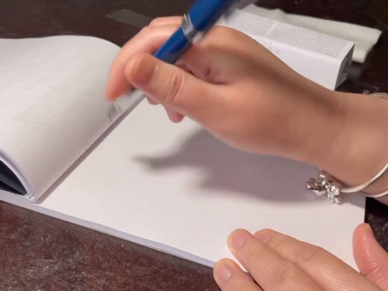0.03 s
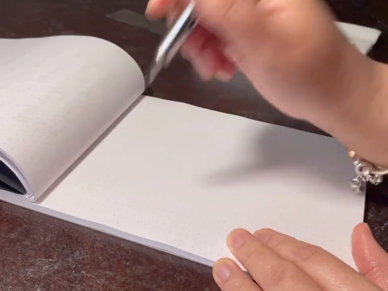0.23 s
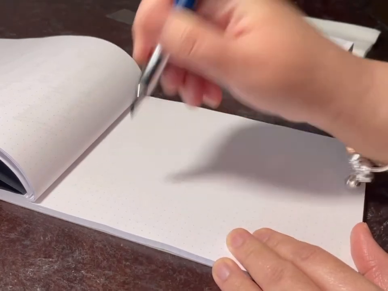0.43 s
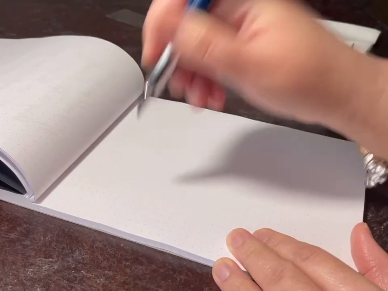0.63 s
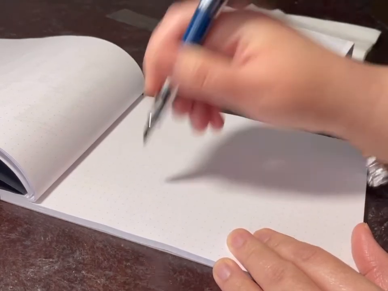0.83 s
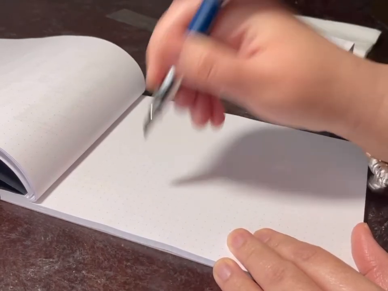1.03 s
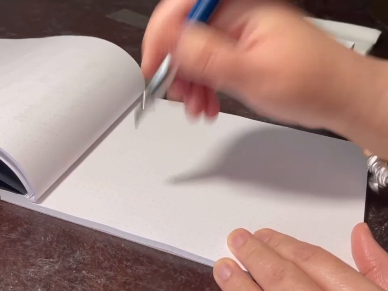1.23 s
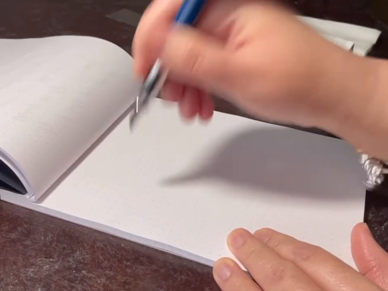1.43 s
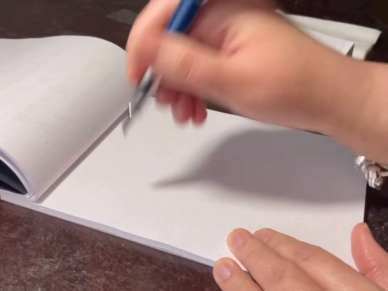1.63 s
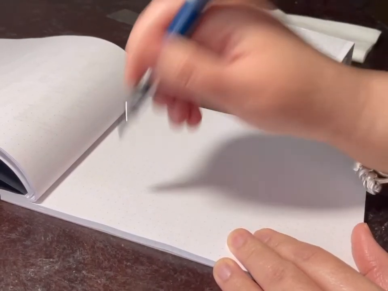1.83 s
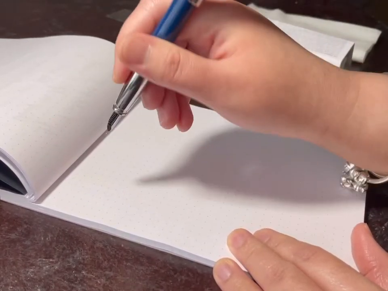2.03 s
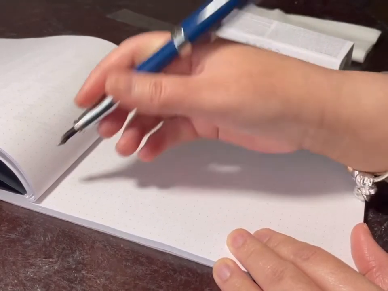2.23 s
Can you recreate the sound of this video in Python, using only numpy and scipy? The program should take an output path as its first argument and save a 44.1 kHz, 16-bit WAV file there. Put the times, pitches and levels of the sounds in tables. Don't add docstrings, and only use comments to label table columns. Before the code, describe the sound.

A beaded metal bracelet jingles drily on a shaking wrist, with one knock on the desk

```python
import sys
import numpy as np
from scipy import signal
from scipy.fft import rfft, irfft, next_fast_len
from scipy.io import wavfile
from scipy.ndimage import uniform_filter1d

SR = 44100
rng = np.random.default_rng(int(sys.argv[2]) if len(sys.argv) > 2 else 0)


def ratio_of_db(decibels):
    return 10 ** (np.asarray(decibels, float) / 20)


def unload_audio(sound):
    columns = np.transpose(np.atleast_2d(sound))
    steps = np.round(np.clip(columns, -1, 1) * 32767)
    wavfile.write(sys.argv[1], SR, steps.astype(np.int16))


N = 101429

# time in seconds, peak in dB.
BEAD_CLASHES = [(0.0683, -41), (0.209, -40.5), (0.2764, -25.5), (0.3006, -23.5), (0.3272, -30.5),
                (0.368, -28), (0.4626, -30.5), (0.4695, -24.5), (0.49, -29), (0.503, -22), (0.5129, -18.5),
                (0.5296, -47), (0.5821, -34), (0.623, -39), (0.634, -57), (0.6765, -45), (0.6795, -28),
                (0.6895, -28), (0.7131, -26), (0.725, -6.5), (0.7962, -30), (0.8646, -32), (0.9001, -34),
                (0.9401, -28.5), (0.9523, -34), (0.9585, -14), (1.0301, -45), (1.074, -33.5),
                (1.0868, -27.5), (1.1303, -41), (1.1396, -25.5),
                (1.1584, -19.5), (1.1745, -16), (1.187, -34), (1.2218, -25), (1.27, -32), (1.28, -29.5),
                  (1.288, -18), (1.3022, -42), (1.317, -40), (1.3378, -26), (1.3441, -21), (1.3666, -22.5),
                  (1.382, -23), (1.3864, -32), (1.414, -31.5), (1.43, -28.5), (1.4375, -24.5),
                  (1.4916, -25), (1.4978, -26), (1.504, -22), (1.5114, -23), (1.524, -25), (1.5397, -19.5),
                  (1.544, -20.5), (1.57, -27.5), (1.5848, -20), (1.5912, -34), (1.6093, -22.5),
                  (1.666, -35), (1.675, -36),
                (1.69, -23), (1.696, -28), (1.7003, -25.5), (1.728, -26), (1.7484, -17.5), (1.758, -27),
                (1.773, -22), (1.8004, -20.5), (1.8662, -33.5), (1.8847, -24), (1.8909, -22.5),
                (1.9126, -20), (1.9712, -35), (1.9826, -32), (2.0188, -49), (2.052, -31), (2.0763, -45),
                (2.095, -26.5), (2.1216, -19.5), (2.1352, -22), (2.196, -44), (2.2286, -25),
                (2.2381, -24.5), (2.2665, -25.5), (2.2775, -32.5), (2.2908, -25)]
# start in seconds, length in seconds, level in dB.
RATTLE_RUNS = [(0, 0.0073, -47.5), (0.1, 0.034, -45), (.272, 0.019, -37.5), (0.493, 0.017, -38),
               (0.712, 0.049, -36.5), (0.953, 0.04, -42), (1.128, 0.048, -38.5), (1.297, 0.057, -42),
               (1.364, 0.018, -37), (1.486, 0.083, -44.5), (1.577, 0.022, -38), (1.677, 0.071, -51.5),
               (1.765, 0.025, -37.5), (1.874, 0.04, -42.5), (1.976, 0.015, -45), (2.099, 0.08, -60.5),
               (2.235, 0.094, -62)]
# start in seconds, length in seconds, level in dB.
BEAD_HEAPS = [(.2995, 0.0052, -36.5), (.3275, 0.0043, -38.5), (.1005, 0.0021, -28), (.3748, 0.0022, -38),
              (.7265, 0.0046, -38), (.8152, 0.0022, -26.5), (1.369, 0.011, -43), (1.539, 0.0044, -42),
              (1.582, 0.0057, -45.5), (1.798, 0.0065, -39.5), (1.908, 0.0096, -40.5), (1.98, 0.008, -35),
              (1.992, 0.007, -44)]
# frequency in Hz, gain in dB.
BEAD_COLOUR = [(900, -37), (2200, -15), (4000, -9.5), (6500, -6.5), (8200, -0.5), (10800, -1.5),
               (13200, -4.5), (15000, 2.5), (17000, -45)]
# time in seconds, peak in dB, share of the full ring length from 0 to 1.
CHARM_STRIKES = [
    (.1005, -11.5, .9),
    (.3748, -13, .9),
    (.7696, -19.5, .6),
    (.8152, -22, .65),
    (.9762, -25, .8),
]
# frequency in Hz, level in dB, T60 in seconds.
CHARM_MODES = [(4400, -20, .008), (4900, -20, .008), (7127, -13, .016), (8829, -13, .012), (10700, 0, .012),
               (10880, -13, .03), (12940, -5, .02), (15280, -12, .012)]
# time in seconds, peak in dB, share of the full ring length from 0 to 1.
DESK_KNOCKS = [
    (.7262, -13, 1),
]
# frequency in Hz, level in dB, T60 in seconds.
DESK_MODES = [(295, -15.5, 0.061), (452, -16, 0.2), (1003, -6.5, 0.036), (1077, -13.5, 0.14),
              (1546, -21, 0.061), (1960, -17, 0.19), (2062, -5.5, 0.12), (2270, 1, 0.044),
              (3223, -7, 0.098), (3374, 1.5, 0.028), (3666, -2.5, 0.031), (4710, -3, 0.02)]
# frequency in Hz, gain in dB.
CRACK_COLOUR = [(300, -15), (1000, -3.5), (2600, -1), (4800, -3.5), (7000, -4), (12000, -17)]
# start in seconds, length in seconds, level in dB.
PAPER_RUBS = [(0, 0.054, -51.5), (.075, 0.066, -45), (.278, 0.015, -39.5), (.288, 0.015, -46.5),
              (.33, 0.0097, -52), (.505, 0.023, -59), (.725, 0.023, -31.5), (.76, 0.082, -48.5),
              (.965, 0.0072, -47.5), (1.845, 0.055, -52), (1.878, 0.034, -39), (1.93, 0.06, -63),
              (1.98, 0.023, -45), (2.01, 0.06, -50), (2.1, 0.093, -54.5), (2.21, 0.12, -44)]
# time in seconds, peak in dB.
PAD_TAPS = [
    (.2845, -21),
    (.2895, -28),
    (.304, -29),
    (0.3064, -29),
    (.971, -33.5),
    (1.681, -48),
    (1.769, -37),
]
# centre in Hz, width in Hz, gain in dB.
PAPER_RESONANCES = [(857, 273, -0.5), (1366, 404, 3), (1797, 735, -0.5), (3760, 3000, -9)]
# start in seconds, length in seconds, level in dB.
HAND_BUMPS = [
    (.05, 0.029, -63.5),
    (.278, 0.027, -52),
    (.505, 0.029, -58),
    (.716, 0.044, -46),
    (.965, 0.012, -54),
    (2.26, 0.031, -61),
]
# frequency in Hz, T60 in seconds.
ROOM_DECAY = [(200, 0.11), (1000, 0.2), (4000, 0.2), (12000, 0.057)]
# frequency in Hz, gain in dB.
WIDE_ECHO = [(300, -11), (1200, -5.5), (2500, -12), (9000, -13.5)]
# frequency in Hz, density in dB per Hz.
AIR_COLOUR = [(20, -20), (32, -13.5), (60, -1), (130, -10.5), (300, -20), (800, -32.5), (6000, -45.5),
              (16000, -40)]
# frequency in Hz, likeness from 0 to 1.
AIR_LIKENESS = [(60, 0.97), (400, 0.37), (1500, 0.1), (3000, 0.66), (8000, 0)]
# frequency in Hz, phase in radians.
PORT_PHASE = [(5700, 0), (6350, -.6), (7700, -2.5), (8800, -3.7), (10400, -5.4), (13000, -7.3), (14200, -9),
              (16400, -10.6)]
# frequency in Hz, left minus right in dB.
PORT_TILT = [(270, -0.5), (1000, 1.5), (5500, 3.5), (8000, 0.2)]

BEAD_SCATTER_DB, CLASH_T60_S, SNAP_DB, LOUDEST_CLASH_DB = 2.6, 0.015, 4, -18
CONTACTS_PER_S, CONTACT_SPREAD_DB, STIR_DB = 2000, 2.2, -60
RUN_RISE_S, RUN_T60_S, HEAP_RISE_S, HEAP_T60_S = 0.0021, 0.12, 0.0016, 0.016
CRACK_DB, CRACK_T60_S = -25, 0.045
THUD_S, THUD_HZ, THUD_DB, THUD_T60_S = 0.735, 132.6, -34.5, 0.38
RUB_SLIPS_PER_S, RUB_GRAIN_DB, RUB_RISE_S, RUB_T60_S = 6000, 3, 0.0028, 0.061
BUMP_HZ, BUMP_WIDTH_HZ, BUMP_T60_S = 370, 550, 0.16
ROOM_DB, BEAD_SPREAD = -10, 0.23
AIR_DB, SWELL_DB = -52, 2.5
DROP_DB, EDGE_HZ, JUMP_DB, JUMP_EDGE_HZ = 6.5, 16100, 7, 16850


def clashes():
    out = np.zeros(N)
    rows = BEAD_CLASHES
    t = np.arange(2048) / SR
    envelope = np.minimum(t / 0.00048, 1) * ratio_of_db(-60 * t / CLASH_T60_S)
    snap = ratio_of_db(SNAP_DB) * (np.arange(2048) == 12)
    lump_hz = np.linspace(0, 17000, num=16)
    for s, db in rows:
        lumps = BEAD_SCATTER_DB * rng.standard_normal(16)
        puff = rng.standard_normal(2048) * envelope + snap
        puff = tint(puff, lambda hz: ratio_of_db(read(BEAD_COLOUR, hz) + np.interp(hz, lump_hz, lumps)))
        add(out, s, ratio_of_db(min(db, LOUDEST_CLASH_DB)) * puff / abs(puff).max())
    return out


def rattle():
    contacts = slips(CONTACTS_PER_S, CONTACT_SPREAD_DB) ** 2
    decay = ratio_of_db(-120 * np.arange(300) / SR / 0.0042)
    flutter = np.sqrt(abs(signal.oaconvolve(contacts, decay)[:N]))
    noise = tint(flutter * rng.standard_normal(N), lambda hz: ratio_of_db(read(BEAD_COLOUR, hz)))
    runs = strokes(RATTLE_RUNS, RUN_RISE_S, RUN_T60_S)
    heaps = strokes(BEAD_HEAPS, HEAP_RISE_S, HEAP_T60_S)
    return (ratio_of_db(STIR_DB) + runs + heaps) * evened(noise)


def charm():
    return strikes(CHARM_STRIKES, CHARM_MODES, spread_db=-6)


def knock():
    return strikes(DESK_KNOCKS, DESK_MODES, spread_db=-1.0)


def crack():
    burst = evened(tint(rng.standard_normal(N), lambda hz: ratio_of_db(read(CRACK_COLOUR, hz))))
    return strokes([(DESK_KNOCKS[0][0], 0.003, CRACK_DB)], 0.00038, CRACK_T60_S) * burst


def thud():
    after = np.maximum(np.arange(N) / SR - THUD_S, 0)
    envelope = ratio_of_db(THUD_DB - 60 * after / THUD_T60_S) * np.minimum(after / 0.0053, 1)
    return envelope * np.sin(2 * np.pi * THUD_HZ * after)


def rub():
    drive = strokes(PAPER_RUBS, RUB_RISE_S, RUB_T60_S) * slips(RUB_SLIPS_PER_S, RUB_GRAIN_DB)
    for s, db in PAD_TAPS:
        add(drive, s, ratio_of_db(db) * np.hanning(14))

    def pad(hz):
        return np.sqrt(sum(ratio_of_db(2 * db) * bell(hz, centre, width) for centre, width, db in PAPER_RESONANCES))
    return tint(drive, pad) * ratio_of_db(7)


def bumps():
    dull = tint(rng.standard_normal(N), lambda hz: bell(hz, BUMP_HZ, BUMP_WIDTH_HZ))
    return strokes(HAND_BUMPS, 0.0022, BUMP_T60_S) * evened(dull)


def room(x):
    size = SR // 2
    signs = rng.choice([-1., 1.], (2, size))
    taps = signs * (rng.random((2, size)) < 0.06) * (np.arange(size) > 90)
    hz, t, z = signal.stft(taps, SR, nperseg=256)
    decay = ratio_of_db(-60 * t / read(ROOM_DECAY, hz)[:, None])
    tail = signal.istft(z * decay, SR, nperseg=256)[1]
    return signal.fftconvolve(x[None], tail / np.linalg.norm(tail[0]), axes=1)[:, :N]


def air():
    left, other, waver = rng.standard_normal((3, N))

    def same(hz):
        return np.clip(read(AIR_LIKENESS, hz), 0, 1)
    right = tint(left, same) + tint(other, lambda hz: np.sqrt(1 - same(hz) ** 2))
    swell = ratio_of_db(SWELL_DB * evened(slow(waver, 8)))
    return ratio_of_db(AIR_DB) * evened(swell * tint(np.array([left, right]), lambda hz: ratio_of_db(read(AIR_COLOUR, hz))))


def strikes(rows, modes, spread_db):
    out = np.zeros(N)
    for s, db, free in rows:
        add(out, s, ratio_of_db(db) * ring(modes, rng.standard_normal(14), spread_db, free))
    return out


def ring(modes, shake, spread_db, free):
    t = np.arange(int(SR / 4)) / SR
    x = np.zeros(len(t))
    for (hz, db, t60), nudge in zip(modes, shake):
        decay = ratio_of_db(db + spread_db * nudge - 60 * t / t60 / free)
        x += decay * np.sin(2 * np.pi * hz * t + 2 * nudge)
    return np.minimum(t / 0.00048, 1) * x / abs(x).max()


def strokes(rows, rise_s, t60):
    t = np.arange(N) / SR
    level = np.zeros(N)
    for s, length, db in rows:
        release = ratio_of_db(db - 60 * np.maximum(t - s - length, 0) / t60)
        level += release * np.clip((t - s) / rise_s, 0, 1)
    return level


def slips(per_s, spread_db):
    hit = rng.random(N) < per_s / SR
    size = ratio_of_db(spread_db * np.minimum(rng.exponential(1, N), 4))
    return evened(rng.standard_normal(N) * size * hit)


def bell(hz, centre, width):
    return 1 / (1 + ((hz - centre) / width * 2) ** 4)


def slow(x, corner_hz):
    return tint(x, lambda hz: 1 / (1 + (hz / corner_hz) ** 2))


def tint(x, gain):
    size = next_fast_len(x.shape[-1] + 512)
    return irfft(rfft(x, size) * gain(np.fft.rfftfreq(size, 1 / SR)), size)[..., :x.shape[-1]]


def read(points, hz):
    f, value = np.transpose(points)
    return np.interp(np.log(hz + 1), np.log(f + 1), value)


def evened(x):
    return x / np.sqrt(np.mean(x ** 2) + 1e-20)


def add(mix, s, sound):
    part = mix[round(s * SR):][:len(sound)]
    part += sound[:len(part)]


def port(x, side):
    return tint(x, lambda hz: ratio_of_db(side * read(PORT_TILT, hz)) * np.exp(side * 1j * read(PORT_PHASE, hz)))


def scene():
    beads = clashes() + rattle()
    near = beads + charm() + knock() + crack() + thud() + rub() + bumps()
    echo = room(near)
    drift = BEAD_SPREAD * evened(slow(rng.standard_normal(N), 60))
    wide = tint(echo[1], lambda hz: ratio_of_db(read(WIDE_ECHO, hz))) + drift * beads
    left, right = near + ratio_of_db(ROOM_DB) * echo[0] + wide * np.array([[1], [-1]]) + air()
    return np.array([port(left, 0.5), port(right, -0.5)])


def band_limit(x):
    return signal.sosfilt(signal.butter(12, 17130, fs=SR, output="sos"), x)


def record(dry):
    hz, _, z = signal.stft([dry[0] + dry[1], dry[0] - dry[1]], SR, nperseg=1024)
    power = uniform_filter1d(uniform_filter1d(abs(z) ** 2, size=24, axis=1), size=2, axis=2)
    treble = (abs(z[:, hz > 5000]) ** 2).sum((0, 1))
    jump = treble > np.roll(treble, 1) * ratio_of_db(2 * JUMP_DB)
    hz = hz[:, None]
    strong = power > power[::-1] * ratio_of_db(-2 * DROP_DB)
    steady = (strong | (hz < 2500)) & (hz < EDGE_HZ)
    keep = steady | (jump & (hz < JUMP_EDGE_HZ))
    mid, side = signal.istft(z * keep, SR, nperseg=1024)[1][:, :N] / 2
    return band_limit(np.array([mid + side, mid - side]))


dry = scene()
out = record(dry)
unload_audio(out)
```